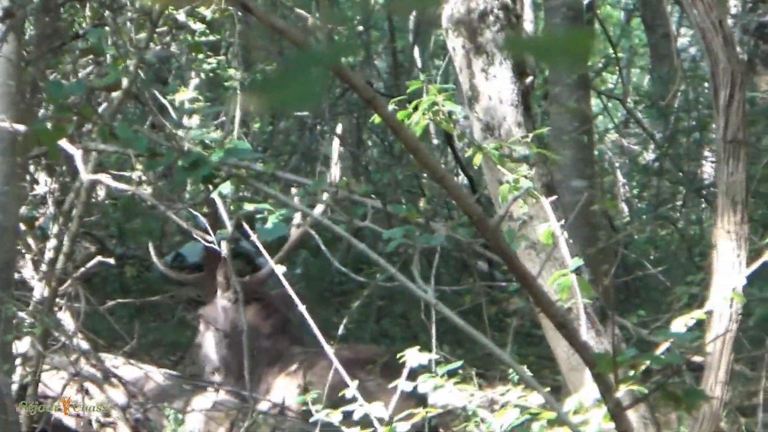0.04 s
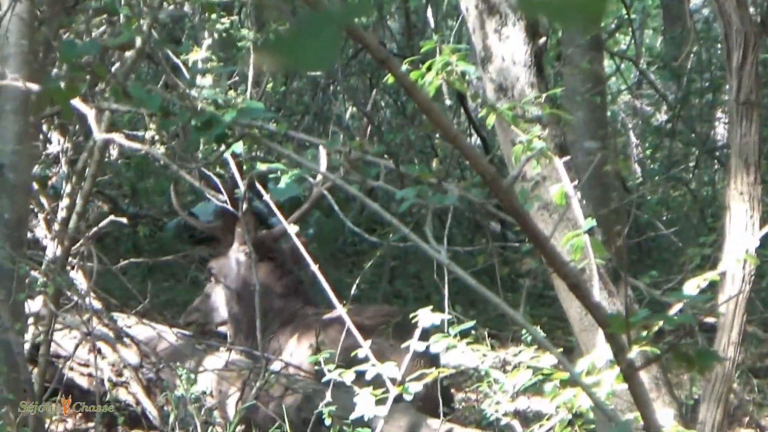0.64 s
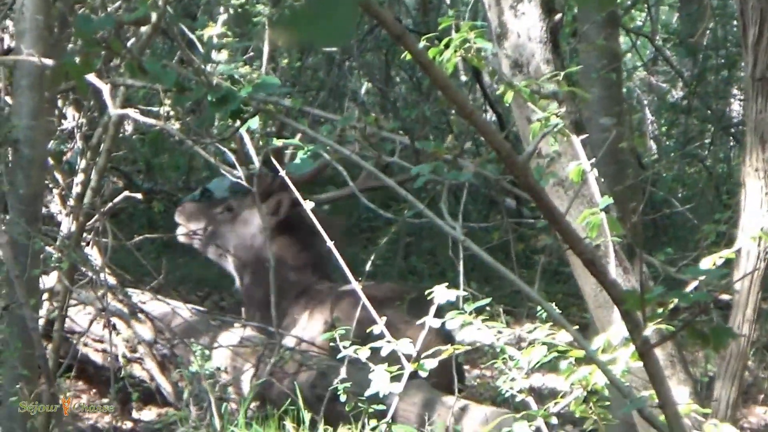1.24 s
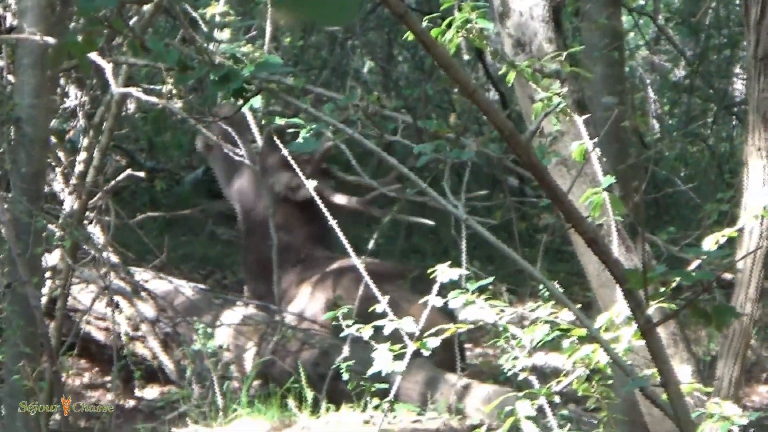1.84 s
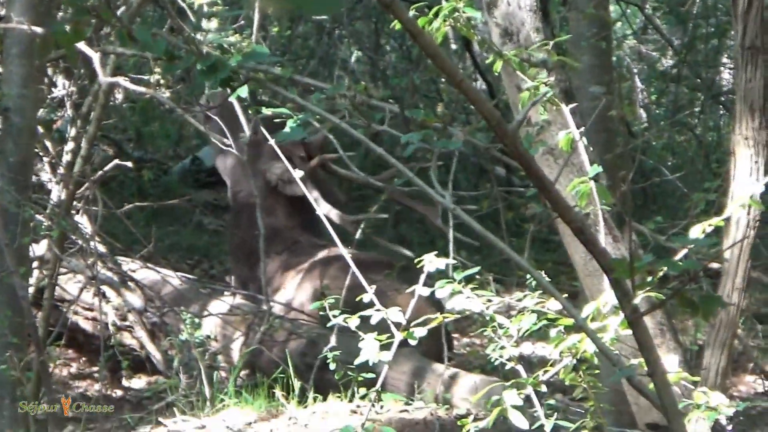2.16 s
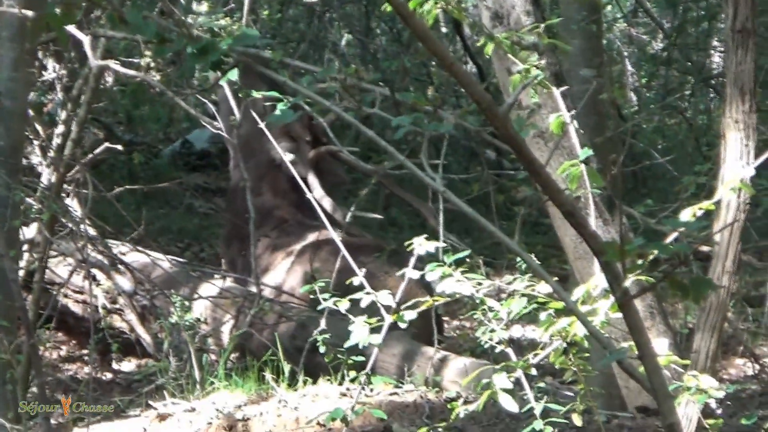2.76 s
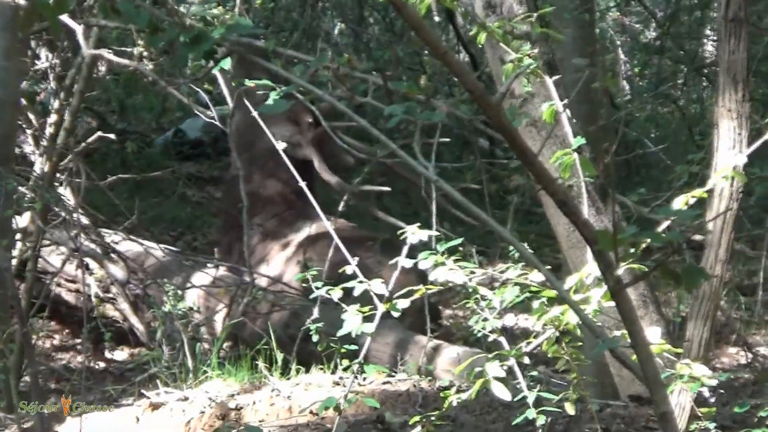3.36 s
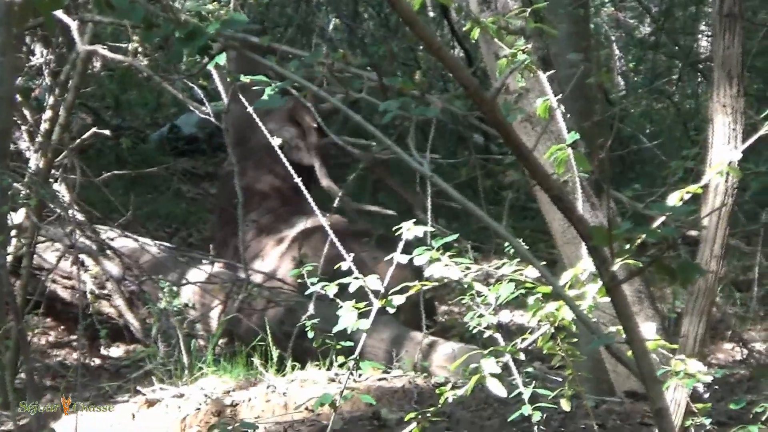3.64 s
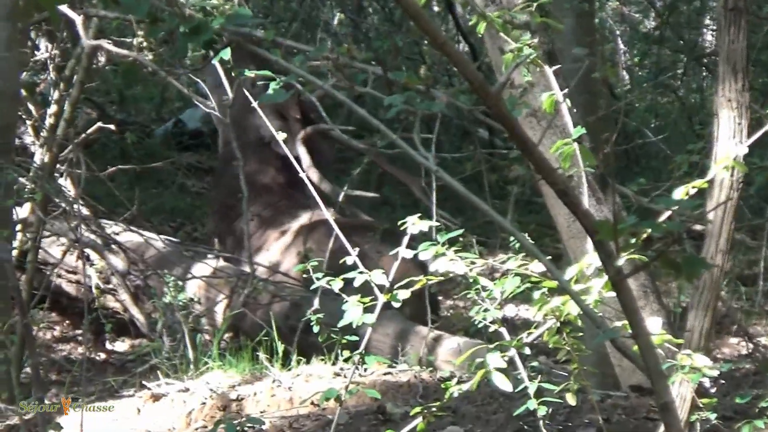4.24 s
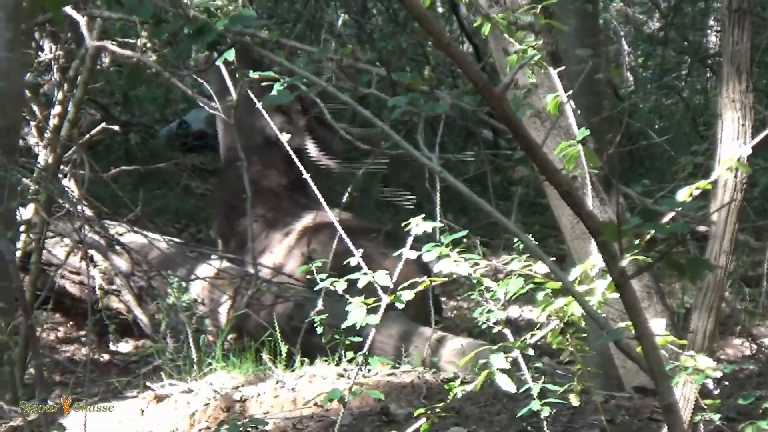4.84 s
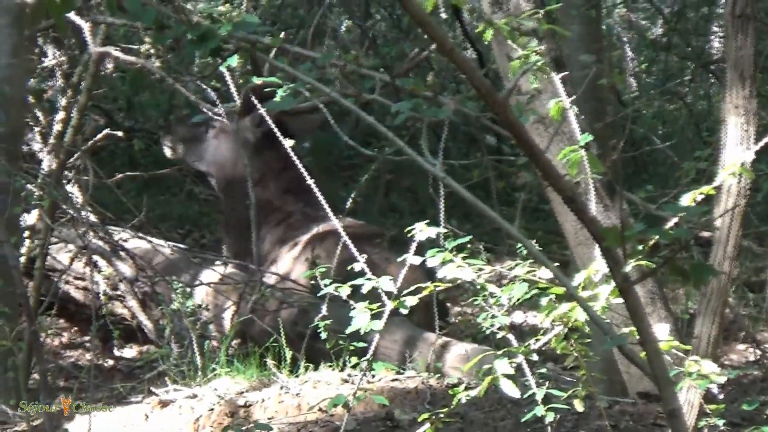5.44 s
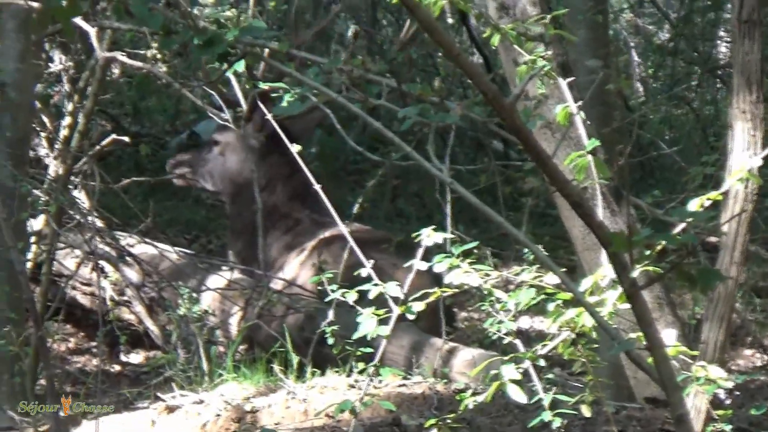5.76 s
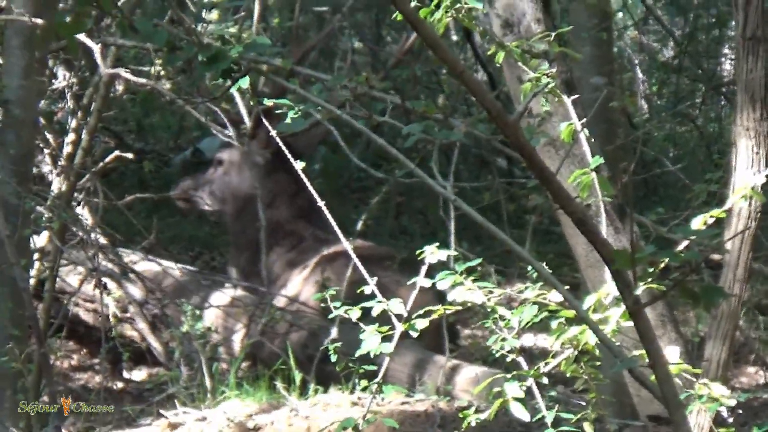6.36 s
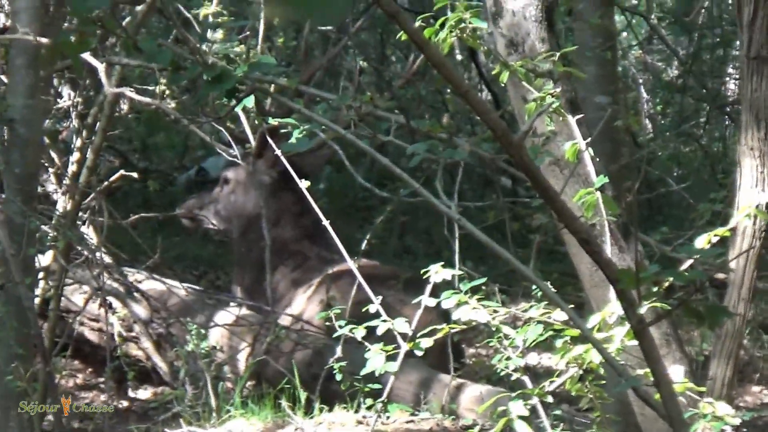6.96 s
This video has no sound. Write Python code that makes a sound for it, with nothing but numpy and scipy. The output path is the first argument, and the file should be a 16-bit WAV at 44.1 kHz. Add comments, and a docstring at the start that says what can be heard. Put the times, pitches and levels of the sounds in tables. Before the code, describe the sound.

A faint, even woodland murmur runs for all seven seconds, with barely audible rapid ticking far off. At 0.7 seconds a camera shutter beside the microphone clacks twice, crisp and mechanical, about five clicks a second. At 1.2 a red deer stag, ahead among the trees, gives a short, clear grunt that falls and breaks up. From 1.8 to 3.2 comes his long, low roar, swelling in three pushes, its rough buzz turning into a quickening rattle and sinking at the end. Three shutter clicks overlap it from 2.2 to 2.7, and four more follow from 3.5 to 4.2. From 4.3 to 4.9 the stag gives a softer, hoarse growl that slows and drops in pitch. Each call leaves an echo scattered by the trees. Two last shutter clicks come at about 6.1 seconds, and then only the quiet wood remains.

```python
"""A red deer stag in a quiet wood gives a falling grunt, a long rattling roar and a shorter growl.
His vocal folds buzz and slap irregularly into a long throat, and the trees scatter the sound back.
Close to the microphone a reflex camera fires bursts of frames, its mirror and shutter clacking.
Behind it all the wood murmurs and ticks faintly."""
import sys
import numpy as np
from scipy import signal
from scipy.fft import rfft, irfft, next_fast_len
from scipy.io import wavfile
from scipy.ndimage import uniform_filter1d, map_coordinates

SR = 44100
rng = np.random.default_rng(int(sys.argv[2]) if len(sys.argv) > 2 else 0)


def log_audio(samples):
    """Write samples as a 16-bit WAV file to the path given in sys.argv[1]."""
    # one column per channel
    frames = np.atleast_2d(samples).T
    # limit to full scale, then quantise
    limited = np.clip(frames, -1, 1)
    pcm = np.round(limited * 32767).astype(np.int16)
    wavfile.write(sys.argv[1], SR, pcm)


N = 313551

# The roar's voice. Each row: time in seconds, pitch in Hz, clear share of the voice from 0 to 1.
ROAR_VOICE = [(1.761, 73, .3), (1.83, 70.5, .35), (1.9, 71.5, .35), (1.99, 70, .11), (2.4, 70.4, .05),
              (2.9, 71.2, .14), (3.1, 69, .15), (3.22, 58, .1)]
# Loudness of its low, middle and high parts.
# Each row: level in dB, rise in seconds, drop in dB a second, fade-out in seconds.
ROAR_LEVELS = [(-49.5, 0.093, -2.32, 0.0498), (-33, 0.091, 0.97, 0.121), (-42.5, 0.102, 1.25, 0.1593)]
# Pushes, louder and with the larynx pulled down. Each row: time in seconds, half length in seconds,
# middle and high boost in dB, low boost in dB, share by which the throat's resonances drop.
PUSHES = [(1.869, 0.1066, 3, 7, 0.0541), (2.758, 0.1135, 3.5, 0.5, 0.0385), (3.067, 0.0845, 2.5, 1.5, .08)]
# Throat resonances, neck raised and neck stretched. Each row: frequency in Hz, width in Hz, level in dB.
RAISED_THROAT = [(143.4, 14, -25), (228, 82, -17), (268, 25.6, -17.5), (497.1, 25.5, -2.5),
                 (863.1, 18.6, -10.5), (1153, 64.4, -12.5), (1436, 54, -12.5), (1685, 51, -11),
                 (1946.6, 18.8, -7), (2363.4, 50.6, -5.5), (2526, 59, -4.5), (3010.4, 86, -5),
                 (3438, 56, -8.5), (4074, 550, -17.5), (4923, 78, -15.5)]
STRETCHED_THROAT = [(139.2, 16.6, -32.5), (221.3, 23.1, -9.5), (279.5, 58, -18.5), (497.9, 13, -9),
                    (693, 137, -22.5), (903.1, 65, -8), (1099.2, 98.7, 1), (1392.5, 44.4, -6),
                    (1581.4, 22.4, -3.5), (1719.4, 116, -13.5), (2089.5, 55.6, -18.5), (2244, 63, -18),
                    (2667, 68, -22.5), (2984, 48, -23), (3230, 71, -24.5), (4030, 630, -27.5),
                    (4970, 63, -29.5)]
# Hiss of the open mouth, also used by the grunt. Each row: frequency in Hz, level in dB.
OPEN_HISS = [(3500, -18.5), (5500, 15.5), (6500, 13), (8000, 9.5), (9700, 12.5), (10800, 9.5),
             (13000, -7.5), (16000, -48.5)]

def roar():
    """The long roar, in three pushes: the neck stretches and the buzz becomes a quickening rattle."""
    t = call_time(1.755, 3.2176)
    throb = throbbing(t, start=1.919, rate=21.05, speedup=20.8, width_s=.008,
                      depth_db=4, fade_db=3, scatter_s=.0025, uneven_db=2)
    folds, tone = larynx(t, ROAR_VOICE, throb, bite=.3, flutter_db=-2, jitter=.008, harmonic=2)
    levels = np.array([envelope(t, *row) for row in ROAR_LEVELS])
    tuning = 1.025  # multiplies the throat's resonances
    for s, length, voice_db, chest_db, drop in PUSHES:
        push = np.exp(-((t - s) / length) ** 2)
        levels = levels + np.outer([chest_db, voice_db, voice_db], push)
        tuning = tuning - drop * push
    stretch = np.interp(t, [1.95, 2.2, 2.55], [.047, .638, .928])
    voiced = throat(folds * (1 - stretch), RAISED_THROAT, tuning)
    voiced += throat(folds * stretch, STRETCHED_THROAT, tuning)
    return mouth(t, voiced, amp(-14) * tone, throb, levels, OPEN_HISS, hiss_db=-15)

# The grunt's voice. Each row: time in seconds, pitch in Hz, clear share from 0 to 1.
GRUNT_VOICE = [(1.15, 212, .75), (1.185, 219, .95), (1.215, 214, .95), (1.24, 200, .87), (1.285, 164, .55),
               (1.33, 135, .35)]
# Its low, middle and high parts.
# Each row: level in dB, rise in seconds, drop in dB a second, fade-out in seconds.
GRUNT_LEVELS = [(-40, 0.132, 4.5, 0.067), (-33.5, 0.0259, 4, 0.105), (-37.5, 0.068, 123, 0.065)]
# Its throat resonances. Each row: frequency in Hz, width in Hz, level in dB.
GRUNT_THROAT = [(196, 155, -18.5), (314, 43.6, -13), (429.8, 47, -13.5), (585, 34, -17), (851, 16, -8),
                (1139, 144, -5.5), (1229.3, 45, 1), (1528, 26, -3), (1834, 118, -6), (2157, 62, -10.5),
                (2513, 108, -1.5), (3234.4, 37.3, -1), (3612, 109, -7), (4120, 210, -17), (4763, 202, -15)]

def grunt(sink_per_s=.204):
    """A short, clear call that sinks and breaks up."""
    t = call_time(1.152, 1.3399)
    folds, tone = larynx(t, GRUNT_VOICE, throb=1, bite=1, flutter_db=-5.5, jitter=.004, harmonic=1)
    levels = [envelope(t, *row) for row in GRUNT_LEVELS]
    voiced = throat(folds, GRUNT_THROAT, 1 - sink_per_s * (t - t.mean()))
    return mouth(t, voiced, amp(1) * tone, 1, levels, OPEN_HISS, hiss_db=-15)

# The growl's voice. Each row: time in seconds, pitch in Hz, clear share from 0 to 1.
GROWL_VOICE = [(4.33, 76.13, 0.16), (4.38, 77.39, 0.154), (4.52, 70.13, 0.075), (4.59, 76.45, 0.115),
               (4.73, 74.57, 0.253), (4.8, 67.71, 0.1083), (4.9, 55.01, 0.0943)]
# Its low, middle and high parts.
# Each row: level in dB, rise in seconds, drop in dB a second, fade-out in seconds.
GROWL_LEVELS = [(-47.5, 0.019, -7, 0.153), (-38, 0.0066, 2, 0.175), (-44, 0.029, 11.5, 0.011)]
# Resonances of the throat and the closing mouth. Each row: frequency in Hz, width in Hz, level in dB.
GROWL_THROAT = [(218.8, 20.8, -3.5), (357, 34, -23.5), (486.4, 35, -11.5), (700, 102, -15),
                (857.3, 35, -2.5), (1129, 82.5, 2), (1365.6, 69, 0), (1600, 45, -13), (1699, 91, -4.5),
                (2161, 390, -15.5), (2665, 106, -17.5), (3332, 305, -19.5), (4350, 990, -20),
                (5010, 144, -31.5)]
CLOSING_MOUTH = [(2067, 115, -3)]
# Hiss of the half-closed mouth. Each row: frequency in Hz, level in dB.
HALF_CLOSED_HISS = [(3500, -29), (5500, 11.5), (6500, 9), (8000, 3.5), (9600, 16), (10800, 4.5),
                    (13000, -9.5), (16000, -52.5)]

def growl(sink_per_s=.04, waver_db=2.5):
    """A softer, hoarse call over a wavering note; the rattle slows and the mouth closes."""
    t = call_time(4.331, 4.9093)
    throb = throbbing(t, start=4.331, rate=47.5, speedup=-27, width_s=.0035,
                      depth_db=2.5, fade_db=10, scatter_s=.002, uneven_db=3)
    folds, tone = larynx(t, GROWL_VOICE, throb, bite=.4, flutter_db=-3, jitter=.018, harmonic=3)
    tone = tone * amp(-2 + waver_db * wobble(16, t))
    levels = [envelope(t, *row) for row in GROWL_LEVELS]
    voiced = throat(folds, GROWL_THROAT, 1 - sink_per_s * (t - t.mean()))
    voiced += resonate(folds * np.linspace(0, 1, len(t)) ** 2, CLOSING_MOUTH)
    return mouth(t, voiced, tone, throb, levels, HALF_CLOSED_HISS, hiss_db=-17.5)

# The hardest slaps of the vocal folds. Each row: time in seconds, strength in dB.
SLAPS = [(2.702, 8), (2.732, 8.5), (2.86, 5.5), (4.374, 9.5), (4.393, 5.5), (4.576, 10)]

def throbbing(t, start, rate, speedup, width_s, depth_db, fade_db, scatter_s, uneven_db):
    """Slack folds make the level throb; each second the rate gains speedup and the throbs lose fade_db."""
    age = t - start
    beats = pulses((rate + speedup * age) * (age >= 0), scatter_s, uneven_db)
    swell = np.exp(-(np.arange(-SR // 20, SR // 20) / SR / width_s) ** 2)
    throbs = amp(depth_db - fade_db * age) * signal.fftconvolve(beats, swell, "same")
    slaps = sum(amp(db) * np.exp(-((t - s) / .00478) ** 2) for s, db in SLAPS)
    return 1 + np.maximum(throbs, slaps)

def larynx(t, voice, throb, bite, flutter_db, jitter, harmonic):
    """The vocal folds mix an even buzz with flutter and rushing air; one low harmonic stays clean."""
    pitch, clear = curves(voice, t)
    pitch = pitch * (1 + jitter * wobble(40, t))
    buzz = pulses(pitch, scatter_s=.00002, uneven_db=1.5)
    flutter = pulses(pitch, scatter_s=.0015, uneven_db=3.5)
    rough = rng.standard_normal(len(t)) + amp(flutter_db) * unit(flutter)
    rough = unit(rough * throb ** bite)
    tone = np.sqrt(2) * np.sin(2 * np.pi * harmonic * np.cumsum(pitch) / SR)
    return np.sqrt(clear) * unit(buzz) + np.sqrt(1 - clear) * rough, tone

def throat(x, modes, tuning, tremble=.009):
    """The throat's resonances slide and tremble: they ring on a clock whose speed is the tuning."""
    clock = np.cumsum(tuning * (1 + tremble * wobble(22, np.arange(len(x)) / SR)))
    even = np.arange(int(clock[-1]))
    return np.interp(clock, even, resonate(np.interp(even, clock, x), modes))

def mouth(t, voiced, tone, throb, levels, hiss_shape, hiss_db):
    """The mouth sends out a low chest tone, a throbbing middle and a hissing top, each at its level."""
    low_db, middle_db, high_db = levels
    low = steady(filtered(voiced, lambda f: below(f, 588) * (1 - below(f, 75))))
    middle = steady(filtered(voiced, lambda f: below(f, 1737) - below(f, 789.5)), size=900)
    high = steady(filtered(voiced, lambda f: 1 - below(f, 1862)))
    breath = rng.standard_normal(len(t)) * np.sqrt(throb)
    hiss = steady(ringing(breath, lambda f: amp(along(hiss_shape, f))))
    call = amp(low_db) * steady(low + tone) + amp(middle_db) * steady(middle * throb)
    call += amp(high_db) * (high + amp(hiss_db) * hiss)
    fade = np.clip(np.minimum((t - t[0]) / .0024, (t[-1] - t) / .0136), 0, 1)
    start = round(t[0] * SR)
    return np.pad(call * fade, (start, N - start - len(t)))

def envelope(t, level_db, rise_s, drop, fade_s, ends_db=-17):
    """A call's level in dB: it rises, drifts steadily and fades."""
    ramp = lambda s, length: np.clip(1 - s / length, 0, 1) ** 2
    age = t - t[0]
    held = level_db - drop * np.maximum(age - rise_s, 0)
    return held + ends_db * (ramp(age, rise_s) + ramp(t[-1] - t, fade_s))

# Camera bursts. Each row: start in seconds, number of frames, seconds between frames, level in dB.
BURSTS = [(0.671, 2, .215, -2.7), (2.193, 3, .206, .8), (3.503, 4, .2078, 1.6), (6.049, 2, .207, -2)]
# The knocks in one frame: release, mirror up, curtains, mirror down, recocking.
# Each row: seconds into the frame, level in dB, extra treble in dB.
CONTACTS = [(.001, -4.5, -3.5), (.006, -3.5, -1), (0.0133, 3.5, -5), (0.0194, 0.5, 2), (.056, -1.5, -18),
            (0.062, -6.5, 3.5), (0.076, -7, 5), (.082, -5, 1), (0.1016, -1, -2), (.109, -5.5, 5.5),
            (0.1167, -6, 2)]
# Resonances of the camera's shell. Each row: frequency in Hz, width in Hz, level in dB.
CAMERA_SHELL = [(436.5, 288, 2.5), (814, 193.4, 10.5), (1302, 550, 5.5), (1848, 257, 9), (2453, 306, 8.5),
                (3142, 700, 0.5), (3920, 453, 4), (4830, 306, -4), (6610, 2050, 2.5), (7770, 1150, 0)]
# The snap of its metal parts. Each row: frequency in Hz, level in dB.
CAMERA_METAL = [(2000, -19), (5400, -10), (6600, -5.5), (8000, -0.5), (9800, 3), (10800, -7),
                (12500, -10.5), (15500, -24)]

def shutter(click_s=.0475, ring_s=.294, rise_s=.00061):
    """Every frame sends the same chain of knocks through the camera's shell and metal parts."""
    t = np.arange(SR // 5) / SR
    decay = amp(-60 * t / click_s) ** 2 + amp(-13 - 60 * t / ring_s) ** 2
    metal_decay = decay * (1 - np.exp(-t / rise_s))
    shell_power, metal_power, cracks = np.zeros((3, N))
    frames = [(first + k * gap, db) for first, count, gap, db in BURSTS for k in range(round(count))]
    for s, frame_db in frames:
        for after, db, treble_db in CONTACTS:
            start = round((s + after) * SR)
            force = amp(frame_db + db + rng.normal(0, 1))
            cracks[start] += force * amp(17)
            shell_power[start:start + len(t)] += force ** 2 * decay
            metal_power[start:start + len(t)] += (force * amp(treble_db)) ** 2 * metal_decay
    shell_noise, metal_noise = rng.standard_normal((2, N))
    knock = resonate(cracks + np.sqrt(shell_power) * shell_noise, CAMERA_SHELL)
    snap = unit(filtered(metal_noise, lambda f: amp(along(CAMERA_METAL, f))))
    return amp(-43) * knock + amp(-44) * np.sqrt(metal_power) * snap

def foliage(x, smear_s=.0035):
    """Leaves on the way delay each frequency a little differently, which blurs every pulse."""
    delay = lambda f: smear_s * np.abs(wobble(1 / 250, f))
    return filtered(x, lambda f: np.exp(-2j * np.pi * np.cumsum(delay(f)) * f[1]))

# How much echoes differ between the ears. Each row: frequency in Hz, level of the difference in dB.
ECHO_WIDTH = [(150, -55), (350, -16.5), (700, -6), (1200, -6), (2200, -4.5), (5000, -1.5), (9000, -7),
              (13000, -41)]

def trees(x, decay_times, delay_s, width_db):
    """Trunks and leaves scatter a stereo echo; each frequency dies away at its own speed."""
    hz, t, noise = signal.stft(rng.standard_normal((2, 3 * SR // 2)), SR, nperseg=256)
    decay = amp(-60 * t / along(decay_times, hz)[:, None])
    mid, side = signal.istft(noise * decay, SR, nperseg=256)[1]
    side = filtered(side, lambda f: amp(width_db + along(ECHO_WIDTH, f)))
    tail = np.array([mid + side, mid - side]) / np.linalg.norm(mid)
    late = np.pad(x, (round(delay_s * SR), 0))
    return signal.fftconvolve(late[None], tail, axes=1)[:, :N]

# The long echo of the wood. Each row: frequency in Hz, seconds to fade by 60 dB.
WOOD_DECAY = [(220, 0.62), (450, 2.76), (1100, 1.14), (2400, 1.083), (5000, 0.758), (10000, 0.962)]

def stag_echo(stag):
    """Near and far trees answer the stag; most of the bass bends round the trunks instead."""
    scattered = filtered(stag, lambda f: 1 - .8 * below(f, 380, order=4))
    near = trees(scattered, [(200, .073), (5000, .169)], delay_s=.002, width_db=-4.5)
    far = trees(scattered, WOOD_DECAY, delay_s=.03, width_db=-4)
    return amp(-5.5) * (near + far)

# The wood's murmur. Each row: frequency in Hz, relative level in dB.
MURMUR = [(15, -72), (25, -41.5), (58, -21), (107, -16), (130, -20.5), (307, -11), (371, -1.5), (425, -8.5),
          (690, 0), (748, -2.5), (954, -2), (2090, -15), (2880, -19), (3130, -17.5), (15800, -27.5)]
# How alike it is in both ears. Each row: frequency in Hz, likeness from 0 to 1.
MURMUR_LIKENESS = [(60, 1), (150, 0.816), (380, 0.936), (950, 0.777), (2380, 0.27), (5980, 0.757),
                   (15000, 1)]
# Which way it leans. Each row: frequency in Hz, left minus right in dB.
MURMUR_BALANCE = [(60, 0.0), (150, -0.5), (380, 1.5), (950, 3), (2380, 0.5), (5980, -0.5), (15000, 0.5)]

def murmur(level_db=-55.5, swell_db=.5):
    """The faint, even murmur of the wood: wide noise that swells slightly."""
    def mid_and_side(f):
        angle = np.arccos(np.clip(along(MURMUR_LIKENESS, f), 0, 1)) / 2
        return amp(along(MURMUR, f)) * [np.cos(angle), np.sin(angle)]
    mid, side = filtered(rng.standard_normal((2, N)), mid_and_side)
    balance = lambda f: amp(np.outer([.5, -.5], along(MURMUR_BALANCE, f)))
    pair = filtered(np.array([mid + side, mid - side]), balance)
    return unit(pair) * amp(level_db - swell_db * wobble(2.632, np.arange(N) / SR))

def ticking(level_db=-76, per_s=15, pitch_hz=3400, width_hz=900, tick_s=.0197):
    """Something small and far away ticks rapidly in the treetops."""
    t = np.arange(N) / SR
    ticks = pulses(per_s * amp(.5 * wobble(5, t)), scatter_s=.002, uneven_db=1)
    gate = signal.fftconvolve(ticks, np.hanning(round(tick_s * SR)), "same")
    band = lambda f: np.exp(-((f - pitch_hz) / width_hz) ** 2)
    return amp(level_db) * unit(filtered(gate * rng.standard_normal(N), band))

def amp(db):
    """Turns decibels into a gain."""
    return 10 ** (np.asarray(db) / 20)

def unit(x):
    """Scales x to an average power of 1."""
    return x / np.sqrt(np.mean(x ** 2) + 1e-20)

def steady(x, size=5292):
    """Evens out the level over about size samples; faster throbs stay."""
    power = uniform_filter1d(uniform_filter1d(x ** 2, size), size // 2)
    return x / np.sqrt(np.abs(power) + 1e-20)

def along(points, hz):
    """Reads between (Hz, value) points on a log frequency scale."""
    f, values = np.transpose(points)
    return np.interp(np.log(hz + 1), np.log(f + 1), values)

def curves(rows, t):
    """Reads each column after the time column at times t."""
    s, *columns = np.transpose(rows)
    return [np.interp(t, s, column) for column in columns]

def call_time(start_s, end_s):
    """The time of each sample in one call."""
    return np.arange(round(start_s * SR), round(end_s * SR)) / SR

def wobble(rate, t):
    """A smooth curve through rate random points per unit of t."""
    return map_coordinates(rng.standard_normal(4096), [(t - t[0]) * rate], mode="wrap")

def pulses(rate, scatter_s, uneven_db):
    """One pulse a cycle, each a little off in time and size."""
    at = np.flatnonzero(np.diff(np.floor(np.cumsum(rate) / SR)))
    late, size = rng.standard_normal((512, 2))[:len(at)].T
    at = np.clip(at + np.round(late * scatter_s * SR).astype(int), 0, len(rate) - 1)
    return np.bincount(at, amp(uneven_db * size), len(rate))

def below(f, hz, order=8):
    """A gain that keeps the frequencies below hz."""
    return 1 / (1 + (f / hz) ** order)

def filtered(x, gain):
    """Multiplies each frequency in x by its gain."""
    n = x.shape[-1]
    size = next_fast_len(n + 8192)
    return irfft(rfft(x, size) * gain(np.fft.rfftfreq(size, 1 / SR)), size)[..., :n]

def ringing(x, gain, size=16384):
    """Filters x so that it rings only after each pulse, never before."""
    cepstrum = irfft(np.log(gain(np.fft.rfftfreq(size, 1 / SR)) + 1e-6))
    cepstrum[1:size // 2] *= 2
    cepstrum[size // 2 + 1:] = 0
    response = irfft(np.exp(rfft(cepstrum)))[:size // 2]
    return signal.fftconvolve(x, response)[:len(x)]

def resonate(x, modes, steepness=1.303):
    """Sends x through resonances: the frequencies at which something likes to ring."""
    def peak(f, hz, width, db):
        detuning = (f * f - hz * hz) / (f * width + 1)
        return amp(db) ** 2 / (1 + detuning ** 2) ** steepness
    return ringing(x, lambda f: np.sqrt(sum(peak(f, *mode) for mode in modes)))

def scene():
    """The stag ahead among the trees, the camera beside the microphone, the wood all around."""
    stag = foliage(grunt() + roar() + growl())
    camera = shutter()
    calls = stag * amp([[-.25], [.25]]) + stag_echo(stag)  # left and right in dB
    clicks = camera * amp([[-.4], [.4]])
    clicks += amp(-4) * trees(camera, [(500, .0336), (8000, .0184)], delay_s=.0005, width_db=0)
    clicks += amp(-9) * trees(camera, [(500, 1), (8000, .134)], delay_s=.022, width_db=-4.5)
    return calls + clicks + murmur() + ticking()

def record(dry):
    """The recorder keeps nothing above 15800 Hz."""
    return filtered(dry, lambda f: f < 15800)

dry = scene()
out = record(dry)
log_audio(out)
```